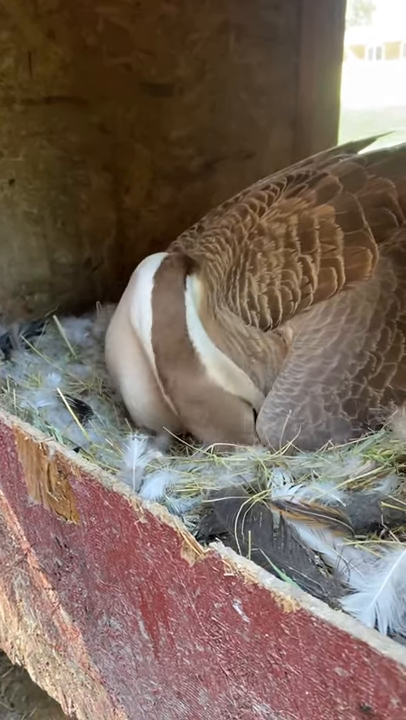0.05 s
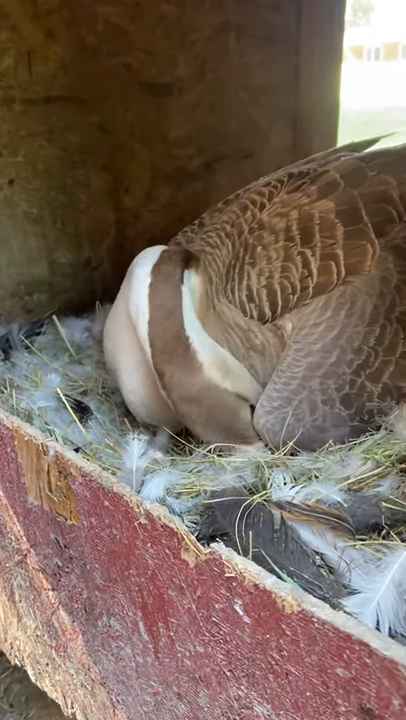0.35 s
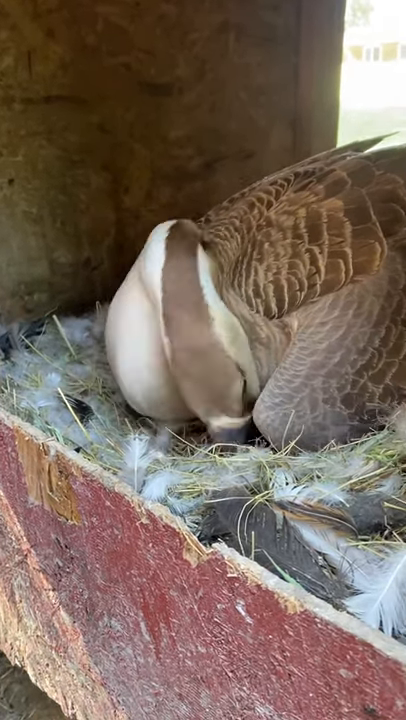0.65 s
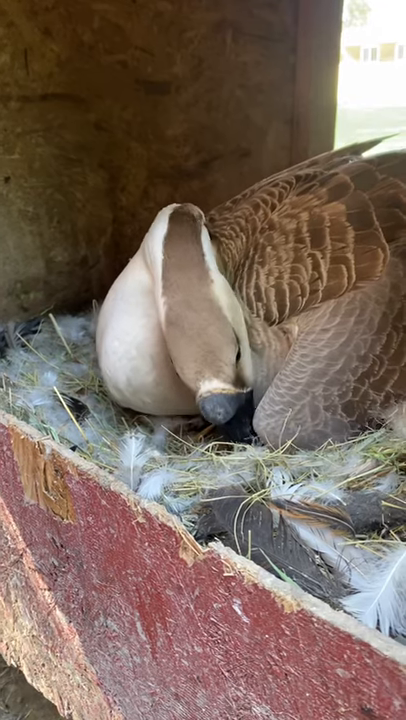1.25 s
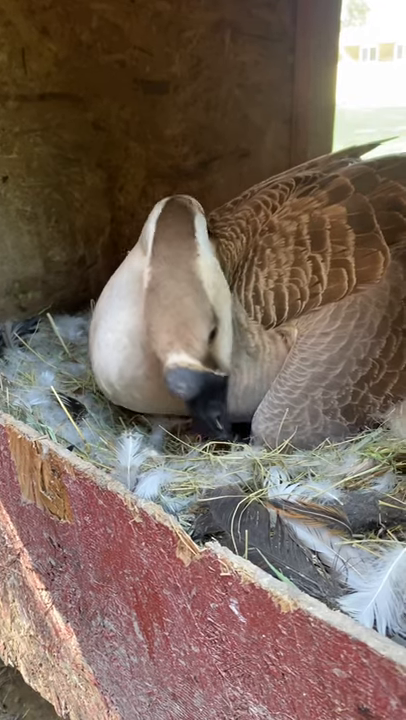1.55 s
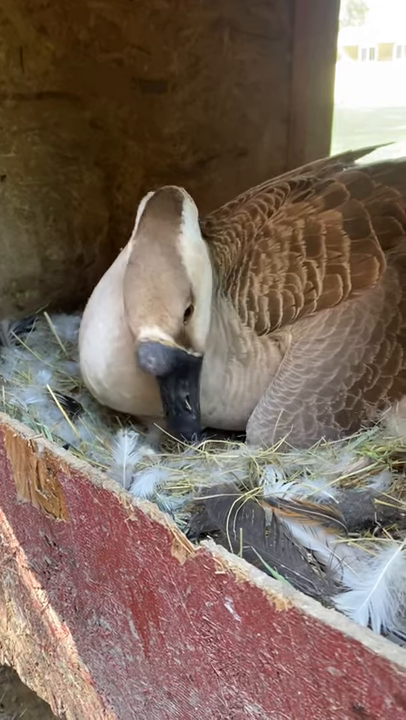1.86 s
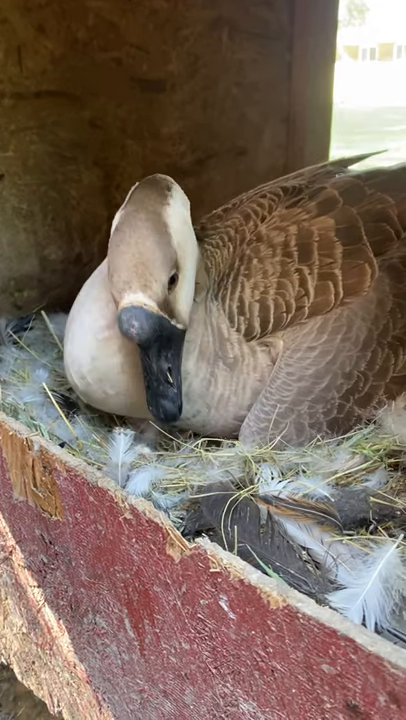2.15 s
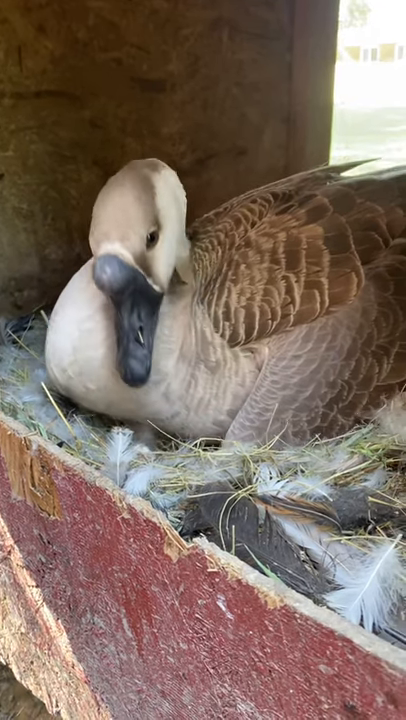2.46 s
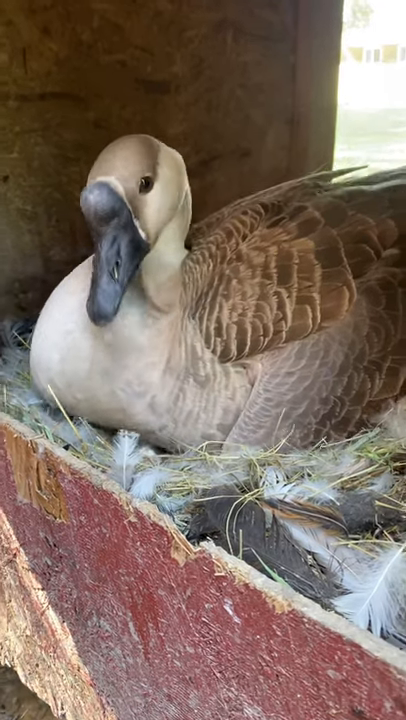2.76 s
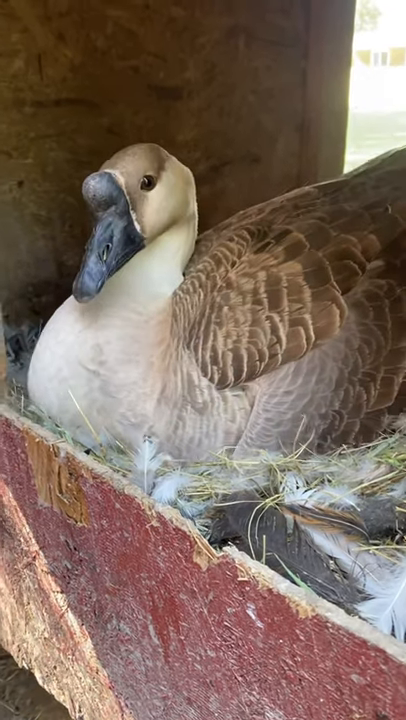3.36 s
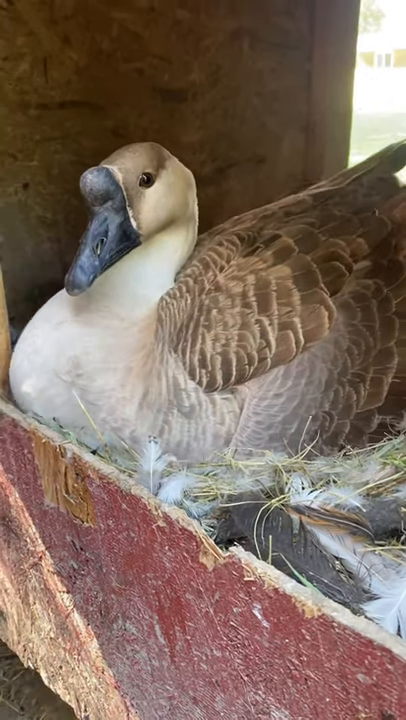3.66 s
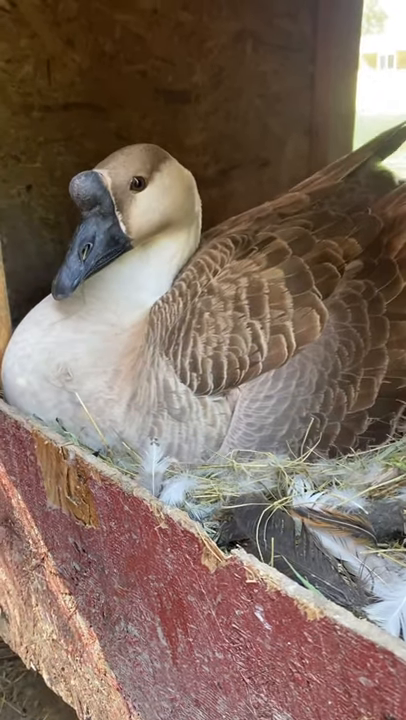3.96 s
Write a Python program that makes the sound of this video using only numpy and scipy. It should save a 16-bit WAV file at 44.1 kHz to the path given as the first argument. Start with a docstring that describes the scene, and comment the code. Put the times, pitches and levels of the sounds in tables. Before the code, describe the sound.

Soft, high goose peeps with breathy hissing, faint straw rustles and a far engine's low throb.

```python
"""A goose shifts on its straw nest in a wooden shelter: noisy scuffs, snapping straws, faint whistles.
Outside, a low throb like a far engine coughs, catches at 1.3 s and idles, each firing ringing its exhaust.
Short squeaky peeps follow, tones that rise and fall, some clear, some hoarse. From about 2 s the bird's
soft, breathy hiss grows, and after 3 s something knocks lightly and sets the boards ringing."""
import sys
import numpy as np
from scipy import signal
from scipy.fft import rfft, irfft
from scipy.io import wavfile

SR = 44100
rng = np.random.default_rng(int(sys.argv[2]) if len(sys.argv) > 2 else 0)


def wav_out(sig):
    """Save sig, one row per channel (or a flat mono array), as 16-bit PCM at SR to the path in sys.argv[1]."""
    wavfile.write(sys.argv[1], SR, np.round(np.clip(np.atleast_2d(sig).T, -1, 1) * 32767).astype(np.int16))


N = 176400
T = np.arange(N) / SR
BIN_HZ = np.fft.rfftfreq(N, 1 / SR)


def from_db(db):
    """Decibels to gain."""
    return 10 ** (np.asarray(db) / 20)


def rms_one(x):
    """Scale to rms 1."""
    return x / np.sqrt(np.mean(x ** 2) + 1e-20)


def in_time(rows):
    """Draw each column of a breakpoint curve at every sample."""
    times, *columns = np.transpose(rows)
    return [np.interp(T, times, column) for column in columns]


def at_hz(points, hz):
    """Read a curve on a log-frequency axis."""
    point_hz, value = np.transpose(points)
    return np.interp(np.log(np.maximum(hz, 1)), np.log(point_hz), value)


def drift(rate_hz):
    """A smooth random wander with a spread of 1, mostly slower than rate_hz."""
    step, settle = 40, 2000
    pole = np.exp(-2 * np.pi * rate_hz * step / SR)
    white = rng.standard_normal(N // step + settle + 2)
    slow = signal.lfilter([1], [1, -2 * pole, pole * pole], white)[settle:]
    return np.interp(np.arange(N) / step, np.arange(len(slow)), rms_one(slow))


def ring(clicks, hz, t60):
    """A resonance: each click starts a sine that dies by 60 dB in t60 seconds."""
    pole, angle = np.exp(-np.log(1000) / (t60 * SR)), 2 * np.pi * hz / SR
    return signal.lfilter([0, np.sin(angle)], [1, -2 * pole * np.cos(angle), pole * pole], clicks + 1e-18)


def clicks_at(times, gains):
    """A train of single clicks."""
    return np.bincount(np.clip(np.asarray(times) * SR, 0, N - 1).astype(int), gains, N)


def coloured(x, colour):
    """Shape a signal with an EQ curve; rms 1."""
    return rms_one(irfft(rfft(x) * from_db(at_hz(colour, BIN_HZ)), N))


def band(spectrum, hz, octaves):
    """Sound from one hump of a spectrum around a centre pitch; rms 1."""
    away = np.log2((BIN_HZ + 1) / hz) / octaves
    return rms_one(irfft(spectrum / (1 + away ** 2) ** 2, N))


def noise(colour=None):
    """Stereo noise, wide in the mids, centred in bass and treble; white unless given a colour; rms 1."""
    # Each row: frequency in Hz, left-right likeness from 0 to 1.
    likeness = [(100, 1), (300, 0.88), (800, 0.16), (2500, 0.34), (6500, 1)]
    alike = np.clip(at_hz(likeness, BIN_HZ), 0, .999)
    mid, side = rfft(rng.standard_normal((2, N)))
    white = irfft(np.sqrt(1 + alike) * mid + np.sqrt(1 - alike) * side * [[1], [-1]], N)
    return coloured(white, colour) if colour else rms_one(white)


def swell(middle, length):
    """A smooth rise and fall that dies away to nothing at the ends of its length, half as strong halfway there."""
    return np.cos(np.pi / 2 * np.clip((T - middle) / length, -1, 1)) ** 2


def outdoor_air(level_db=-68):
    """A steady bed of dark noise."""
    # The air's colour. Each row: frequency in Hz, gain in dB.
    air_colour = [(90, 7), (250, -0.5), (1000, -7), (4000, -13.5), (11000, -33), (15500, -78)]
    return from_db(level_db) * noise(air_colour)


def engine(jitter_s=0.00063, spread_db=1.35, gain_db=11, pass_hz=(38, 300)):
    """Uneven firings ring the exhaust over a rumble; only the bass carries this far."""
    # The idle. Each row: time in seconds, firings per second, level in dB.
    idle = [(1.282, 19.6, -52), (1.45, 17.4, -49), (1.8, 15.2, -59), (2.2, 18.5, -47.5), (3.0, 15.8, -58.5),
            (4.0, 17.6, -49.5)]
    # Coughs before it catches. Each row: time in seconds, level in dB.
    coughs = [(0.164, -62), (0.569, -66.5), (1.146, -54)]
    # Exhaust resonances. Each row: frequency in Hz, relative level in dB, t60 in seconds.
    exhaust = [(49, -13, 0.59), (80.3, -1, 0.38), (149.4, -24.5, 1)]
    # The rumble's fade-in. Each row: time in seconds, level in dB.
    rumble_fade = [(0, -86), (1.1, -60), (1.35, -58.5), (4, -52.5)]
    # The rumble's colour. Each row: frequency in Hz, gain in dB.
    rumble_colour = [(45, -1), (110, -0.5), (200, -11), (3000, -52)]
    rate, db = in_time(idle)
    cycles = np.cumsum(rate * (T > idle[0][0])) / SR
    fired = np.flatnonzero(np.diff(np.ceil(cycles)) > 0)
    late, loud = rng.standard_normal((len(fired), 2)).T
    pulses = clicks_at(T[fired] + jitter_s * late, from_db(db[fired] + spread_db * loud))
    cough_times, cough_db = np.transpose(coughs)
    pulses += clicks_at(cough_times, from_db(cough_db))
    throb = sum(from_db(level + gain_db) * ring(pulses, hz, t60) for hz, level, t60 in exhaust)
    far_throb = signal.sosfilt(signal.butter(2, pass_hz, "band", fs=SR, output="sos"), throb)
    rumble_db, = in_time(rumble_fade)
    return far_throb + from_db(rumble_db) * noise(rumble_colour)


def whistles(jitter=0.051):
    """Faint, hoarse glides that flutter in strength, like chirps farther off."""
    # Each row: start in seconds, length in seconds, first and last pitch in Hz, relative level in dB.
    glides = [(0.125, 0.089, 3260, 2710, -62), (0.354, 0.093, 2337, 1975, -66),
              (0.884, 0.082, 2890, 2590, -69), (1.134, 0.099, 3270, 2890, -70),
              (1.882, 0.11, 2810, 2520, -65), (2.071, 0.022, 3001, 3240, -63.5),
              (2.37, 0.027, 3170, 3550, -58), (2.545, 0.04, 3250, 3030, -70), (3.36, .075, 5050, 5100, -74),
              (3.515, 0.029, 1927, 1840, -61.5)]
    out, wobble = 0, 1 + jitter * drift(219)
    for start, length, first_hz, last_hz, db in glides:
        hz = np.interp(T, [start, start + length], [first_hz, last_hz]) * wobble
        out += from_db(db) * swell(start + length / 2, length) * np.sin(2 * np.pi * np.cumsum(hz) / SR)
    flutter = (1 + drift(250)) / 2
    return out * flutter


def knocks(spread_db=1.0):
    """Each knock rings the boards; a soft contact barely wakes the high modes."""
    # Each row: time in seconds, level in dB, contact cut-off in Hz.
    hits = [(3.146, -42.5, 384.3), (3.233, -51.5, 4000), (3.272, -49, 2470), (3.293, -49, 805),
            (3.739, -55.5, 2518)]
    # The boards' modes. Each row: frequency in Hz, relative level in dB, t60 in seconds.
    boards = [(252, -11, 0.12), (382, -4, 0.065), (441, -9, 0.11), (836, -2.5, 0.08), (925, 0.5, 0.02),
              (1930, -3.5, 0.038), (2470, 0.5, 0.026)]
    times, hit_db, contact_hz = np.transpose(hits)
    scatter_db = spread_db * rng.standard_normal((len(hits), len(boards)))
    out = 0
    for k, (hz, mode_db, t60) in enumerate(boards):
        gains = from_db(hit_db + mode_db + scatter_db[:, k]) / np.hypot(1, hz / contact_hz)
        out += (-1) ** k * ring(clicks_at(times, gains), hz, t60)
    return out


def nest_scuffs(rough_db=3):
    """Bill and feathers scuff unevenly: dull deep in the nest, bright along the feathers."""
    # Each row: middle in seconds, length in seconds, level in dB, centre in Hz, width in octaves.
    scuffs = [(0.097, 0.064, -73, 393, 0.76), (0.167, 0.032, -65.5, 356, 0.36),
              (0.327, 0.032, -69, 900, 1.3), (0.427, 0.039, -70.5, 450, 1.6), (.525, 0.053, -66, 1500, 1.2),
              (.712, 0.054, -67, 654, 0.95), (0.818, 0.069, -67, 360, 0.75), (.848, 0.04, -65.5, 890, 1.86),
              (0.915, 0.045, -66.5, 690, 1), (2.405, 0.066, -72, 4820, 0.45),
              (2.682, 0.49, -70.5, 570, 2.4), (2.916, 0.083, -61.5, 268, 0.64),
              (3.181, 0.14, -59, 330, 1.6), (3.356, 0.03, -68.5, 1510, 1), (3.638, 0.036, -66, 5300, 1.2),
              (3.705, 0.37, -72.5, 495, 1.8)]
    white = rfft(noise())
    roughness = from_db(rough_db * drift(59))
    return roughness * sum(from_db(db) * swell(middle, length) * band(white, hz, octaves)
                           for middle, length, db, hz, octaves in scuffs)


def straw_snaps(attack_s=.002):
    """Thin straws give a bright burst, thick stalks a lower, narrower tick."""
    # Each row: start in seconds, level in dB, decay in seconds, centre in Hz, width in octaves.
    snaps = [(.096, -56, 0.0055, 2440, 0.16), (.212, -64, 0.011, 6240, 1.1),
             (.264, -57.5, 0.0052, 3400, 0.2), (.311, -58, 0.013, 6300, 0.76), (0.34, -55, .005, 2450, 0.2),
             (0.368, -63.5, 0.0046, 8860, 0.47), (0.41, -56.5, 0.0046, 4500, 2.1),
             (0.617, -62, 0.02, 2700, 1.2), (0.641, -50, 0.011, 4600, 1.34), (1.389, -51, 0.002, 8200, 1),
             (2.027, -50, .0038, 2157, 0.96), (2.037, -61, 0.0049, 7100, 1.1),
             (2.312, -58, .006, 7740, 0.98), (2.479, -50, .004, 1190, 0.74),
             (3.648, -54.5, 0.006, 10700, .7)]
    out, white = 0, rfft(noise())
    for start, db, decay, hz, octaves in snaps:
        age = np.maximum(T - start, 0)
        envelope = np.minimum(age / attack_s, 1) * np.exp(-age / decay)
        out += from_db(db) * envelope * band(white, hz, octaves)
    return out


def hiss(flutter_db=2.0, crackles_per_s=140, crackle_db=-11, grain_spread_db=4):
    """Soft breathy hiss, with fine crackle of straw and feathers as the bird moves."""
    # The swell of hiss and crackle together. Each row: time in seconds, level in dB.
    hiss_level = [(0, -77.5), (.45, -74.5), (1.0, -89.5), (1.45, -76), (1.75, -76.5), (1.88, -67.5),
                  (2.15, -72), (2.32, -64), (2.87, -65.5), (3.06, -68.5), (3.6, -63), (4.0, -67.5)]
    # The colours of breath and of straw. Each row: frequency in Hz, gain in dB.
    breath_colour = [(300, 9), (800, 8.5), (1400, 4), (2200, 2.5), (4200, -5.5), (5500, -1.5), (7600, -5),
                     (9500, -4), (13000, -10), (15500, -62)]
    straw_colour = [(300, -15), (3500, -14), (15500, -23.5)]
    onsets = rng.random(N) < crackles_per_s / SR
    strength = from_db(grain_spread_db * np.minimum(rng.exponential(1, N), 4))
    grains = onsets * strength * rng.choice([-1, 1], N)
    crackle = from_db(crackle_db) * coloured(grains, straw_colour)
    level_db, = in_time(hiss_level)
    return from_db(level_db + flutter_db * drift(34)) * (noise(breath_colour) + crackle)


def peeps(jitter=0.01164, shimmer_db=1.5, octave_db=-18, rasp_hz=316, rasp_octave_db=-13.5):
    """Arching tones with a weak octave, part clear, part rasp: loud rise, hushed top, falling tail."""
    # Each row: middle in seconds, length in seconds, held pitch in Hz, level in dB,
    # hoarseness from 0 to 1, middle of the tail in seconds, tail level in dB.
    calls = [(1.37, 0.0199, 1559, -58, 0.3, 1.403, -65), (1.385, 0.0119, 1702, -45.5, 0.06, 1.403, -56),
             (1.393, .016, 2078, -50, .3, 1.431, -56.5), (2.11, 0.029, 1830, -55, 0.17, 2.14, -56),
             (2.25, .026, 1700, -45.5, 0.19, 2.322, -56.5), (2.428, .032, 1880, -46.5, 0.13, 2.498, -52.5),
             (2.651, 0.027, 1950, -37.5, 0, 2.719, -55), (3.663, 0.047, 1750, -62.5, 0.98, 3.695, -78),
             (3.823, .026, 1720, -56.5, 0.4, 3.872, -56), (3.948, .03, 1800, -64, 0.96, 3.976, -66),
             (3.998, 0.032, 1750, -46.5, 0.06, 4.06, -60)]
    low_hz, top_hz = 1327, 2232
    fall_s, tail_length_s, bridge_db = 0.0357, 0.013, -71
    # The pitch scoops up, holds, then flicks to the top; corners in call lengths from the middle.
    corners = np.array([-1, -0.414, 0.198, 0.648])
    wobble = 1 + jitter * drift(135)
    shimmer = from_db(-shimmer_db * drift(86))
    rasp_filter = signal.butter(2, rasp_hz, fs=SR, output="sos")
    rasp_pair = rms_one(signal.sosfilt(rasp_filter, rng.standard_normal((2, N))))
    rasp = (rasp_pair[0] + 1j * rasp_pair[1]) / np.sqrt(2)  # smears a tone into a band of noise
    out = 0
    for middle, length, pitch_hz, db, hoarseness, tail_s, tail_db in calls:
        rise_hz = np.interp(T, middle + length * corners, [low_hz, pitch_hz, pitch_hz, top_hz])
        fall_hz = np.interp(T - tail_s, [-fall_s / 2, fall_s / 2], [top_hz, low_hz])
        tone = np.exp(2j * np.pi * np.cumsum(np.minimum(rise_hz, fall_hz) * wobble) / SR)
        clear = tone + from_db(octave_db) * tone ** 2
        raspy = rasp * tone + from_db(rasp_octave_db) * (rasp * tone) ** 2
        voice = np.imag(np.sqrt(1 - hoarseness) * clear + np.sqrt(hoarseness) * raspy)
        body = from_db(db) * swell(middle, length)
        bridge = from_db(bridge_db) * swell((middle + tail_s) / 2, tail_s - middle)
        tail = from_db(tail_db) * swell(tail_s, tail_length_s)
        out += (body + bridge + tail) * voice
    return out * shimmer


def shelter(x, t60_s=0.14, wet_db=-6.5, predelay_s=.003):
    """Add dense, quickly dying reflections from the wooden walls."""
    age = T[:SR // 2]
    tail = rng.standard_normal((2, len(age))) * np.exp(-np.log(1000) * age / t60_s) * (age > predelay_s)
    tail /= np.sqrt(np.sum(tail ** 2, axis=1, keepdims=True))
    return x + from_db(wet_db) * signal.fftconvolve(x, tail, axes=1)[:, :N]


def scene():
    """Peeps, knocks, whistles and snaps echo in the shelter, over hiss, scuffs, engine and air."""
    slightly_left = from_db([[1.14], [-1.14]])
    short_sounds = (peeps() + knocks()) * slightly_left + whistles() + straw_snaps()
    return shelter(short_sounds) + hiss() + nest_scuffs() + engine() + outdoor_air()


def record(dry):
    """The two microphone ports differ in phase; the deepest bass and the top are cut."""
    # Each row: frequency in Hz, lead of left over right in radians.
    port_phase = [(1000, 0), (3200, .75), (5400, .6), (6200, 1.7), (7400, 3.14), (10700, 6.28),
                  (15500, 11.4)]
    low_cut_hz, high_cut_hz = 45.5, 16500
    hz = np.fft.rfftfreq(2 * N, 1 / SR)
    low_cut = 1 / np.sqrt(1 + (low_cut_hz / (hz + 1)) ** 10)
    phase_shift = np.exp(.5j * at_hz(port_phase, hz) * np.array([[1], [-1]]))
    pair = irfft(rfft(dry, 2 * N) * low_cut * phase_shift)[:, :N]
    return signal.sosfilt(signal.cheby2(14, 60, high_cut_hz, fs=SR, output="sos"), pair)


dry = scene()
out = record(dry)
wav_out(out)
```